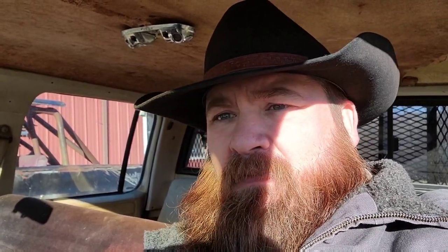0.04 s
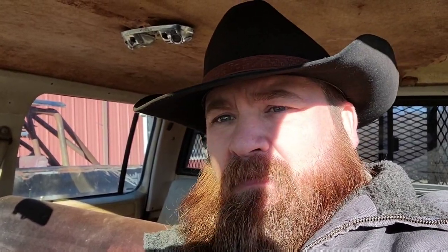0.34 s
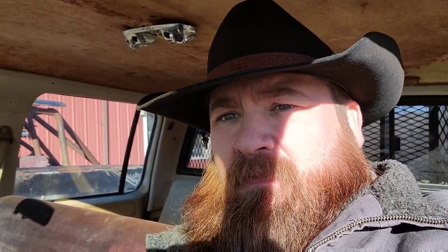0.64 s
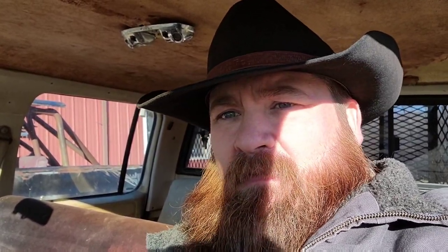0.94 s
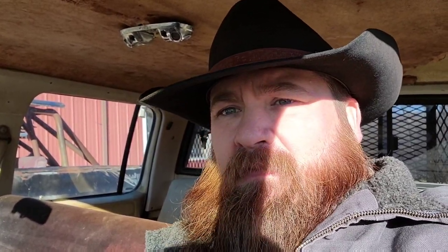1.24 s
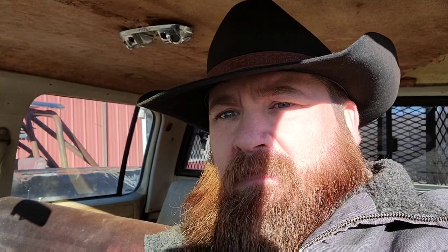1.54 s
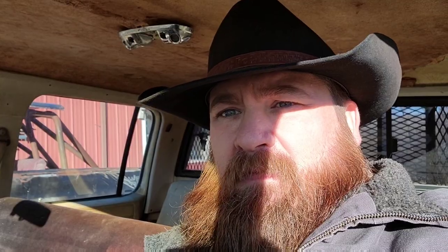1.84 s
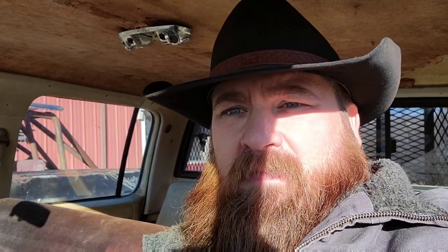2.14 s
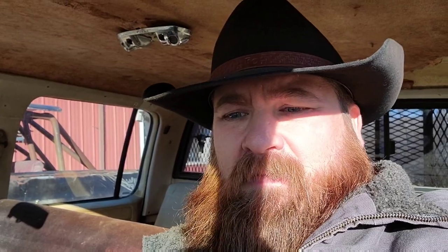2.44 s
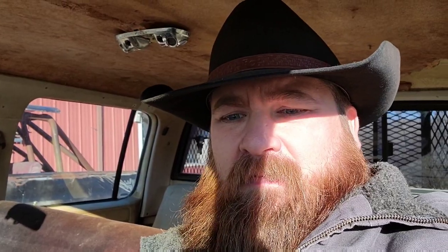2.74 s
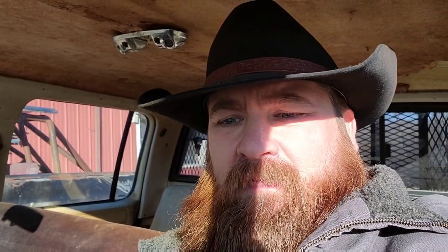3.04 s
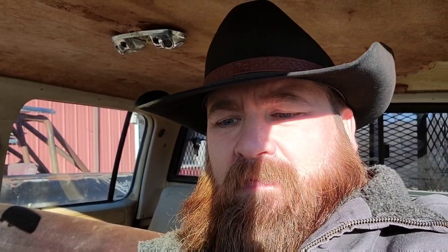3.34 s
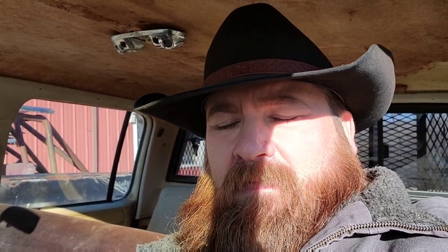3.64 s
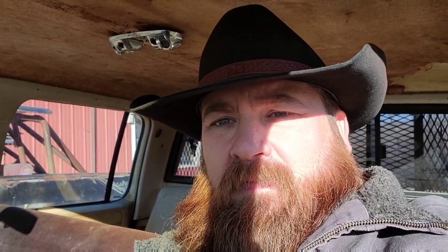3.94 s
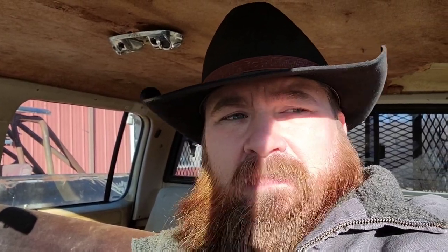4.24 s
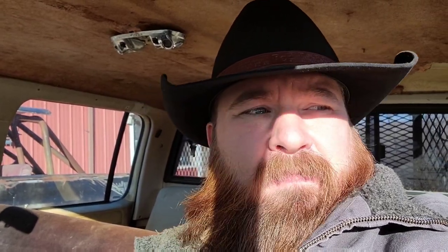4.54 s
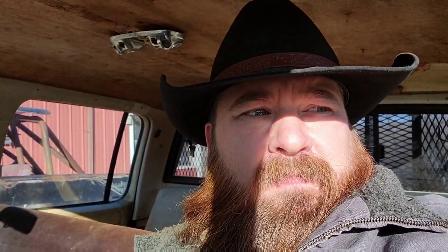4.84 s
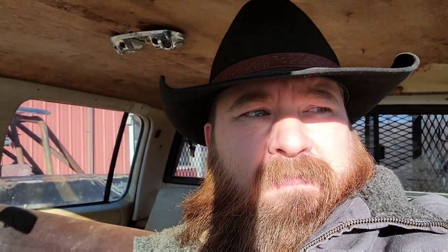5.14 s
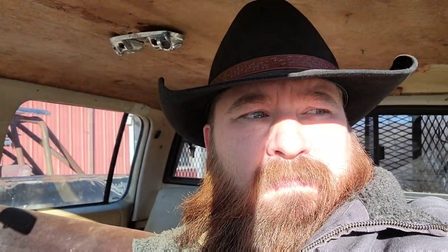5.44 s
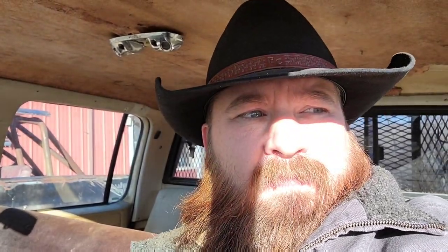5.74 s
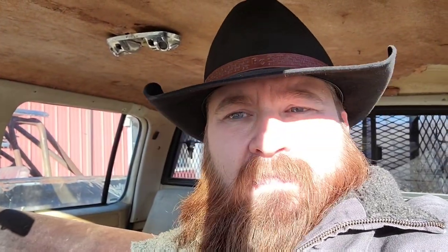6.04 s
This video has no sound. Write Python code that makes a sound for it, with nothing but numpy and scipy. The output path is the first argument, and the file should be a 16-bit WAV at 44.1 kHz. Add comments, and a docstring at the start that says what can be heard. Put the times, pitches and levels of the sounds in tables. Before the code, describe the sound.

Heard from inside a truck cab, a cold V8 engine fires after a quick crank and revs roughly. Its low exhaust thump wavers with misfires while the carburetor gasps and loose tin rattles. The engine slows and nearly dies, coughing and clanking as it shakes. After a short lull the starter engages sharply, cranks, and the engine catches again, still running unevenly.

```python
"""Cold V8 start, from the cab

A big carburetted truck V8 catches, surges and sags on uneven firings, then shudders to a near stop
with loose metal clanking. The starter slams in again and it picks up. Each firing throbs through the
muffler, booms in the cab and barks in the pipes, while air hisses through the carburettor."""
import sys
import numpy as np
from scipy import signal
from scipy.fft import rfft, irfft, next_fast_len
from scipy.io import wavfile
from scipy.ndimage import uniform_filter1d

SR = 44100
rng = np.random.default_rng(int(sys.argv[2]) if len(sys.argv) > 2 else 0)


def store_pcm(level_fs):
    """Save levels as 16-bit WAV."""
    pcm = np.round(np.clip(level_fs, -1, 1) * 32767).astype(np.int16)
    wavfile.write(sys.argv[1], SR, np.atleast_2d(pcm).T)


N = 272538
TIME_S = np.arange(N) / SR


def from_db(db):
    """Decibels to gain."""
    return 10 ** (np.asarray(db) / 20)


def together(*levels_db):
    """Level of several unrelated sounds at once."""
    return 10 * np.log10(sum(from_db(db) ** 2 for db in levels_db))


def unit_rms(x):
    """Scale to unit power."""
    return x / np.sqrt(np.mean(x ** 2) + 1e-20)


def levelled(x, span_s):
    """Even out the slow level and keep the faster beat."""
    size = int(span_s * SR)
    power = uniform_filter1d(uniform_filter1d(unit_rms(x) ** 2, size), size)
    return unit_rms(x) / np.sqrt(np.abs(power) + 1e-5)


def automation(points):
    """Straight ramps between (time_s, value) points."""
    return np.interp(TIME_S, *np.transpose(points))


def hump(time_s, half_s):
    """A smooth rise to 1 and back around a moment."""
    return np.exp(-.5 * ((TIME_S - time_s) / half_s) ** 2)


def since(time_s):
    """Seconds gone by since a moment, 0 before it."""
    return np.maximum(TIME_S - time_s, 0)


def swell(age_s, rise_s):
    """An impact envelope: a soft attack of at least 3 ms, then a decay."""
    age = age_s / max(rise_s, .003)
    burst = np.maximum(age, 0) * np.exp(1 - np.maximum(age, 0))
    scrape = 0.15 * np.exp(-np.abs(age - 1) / 1.87)   # parts rub just before and after they meet
    return burst + scrape


def cut(x, hz, kind, order=2):
    """Butterworth filter."""
    return signal.sosfilt(signal.butter(order, hz, kind, fs=SR, output="sos"), x + 1e-18)


def coloured(x, spectrum):
    """Shape a steady signal with an EQ curve, at unit power."""
    hz, db = np.transpose(spectrum)
    size = next_fast_len(N)
    bins_hz = np.maximum(np.fft.rfftfreq(size, 1 / SR), 1)
    gain = from_db(np.interp(np.log(bins_hz), np.log(hz), db))
    return unit_rms(irfft(rfft(x, size) * gain, size)[..., :N])


def resonate(x, modes):
    """Parallel resonances (pitch_hz, width_hz, gain_db) with alternating signs."""
    out = 0
    for k, (hz, width_hz, db) in enumerate(modes):
        radius = np.exp(-np.pi * width_hz / SR)
        forward = np.array([1, 0, -1]) * (1 - radius ** 2) / 2
        feedback = [1, -2 * radius * np.cos(2 * np.pi * hz / SR), radius ** 2]
        out = out + (-1) ** k * from_db(db) * signal.lfilter(forward, feedback, x + 1e-18)
    return out


def flutter(depth_db, rate_hz):
    """An irregular quiver of level."""
    drift = unit_rms(cut(rng.standard_normal(N), rate_hz, "low"))
    return from_db(depth_db * np.clip(drift, -2, 1.5))


# Stereo image of the cab: frequency_hz, left_right_correlation
CAB_IMAGE = [(100, 1), (250, 0.88), (500, 0.57), (1000, 0.073), (2000, 0.011), (15000, 0.082)]

def diffuse():
    """White noise as the cab spreads it: common in the bass, unrelated in the treble."""
    size = next_fast_len(N)
    alike = np.interp(np.fft.rfftfreq(size, 1 / SR), *np.transpose(CAB_IMAGE))
    mid, side = rfft(rng.standard_normal((2, size)))
    spectrum = np.sqrt(1 + alike) * mid + np.sqrt(1 - alike) * side * [[1], [-1]]
    return unit_rms(irfft(spectrum, size)[:, :N])


def grit(spread_db):
    """Dense tiny impacts of uneven size, each a fraction of a millisecond long."""
    sizes = from_db(spread_db * np.minimum(rng.exponential(1, N // 20 + 1), 4))
    return diffuse() * np.repeat(sizes, 20)[:N]


def cab(x, t60_s, wet_db, low_cut_hz):
    """Close glass and steel return a short dense tail, different on each side."""
    t = TIME_S[:SR // 4]
    tail = cut(rng.standard_normal((2, len(t))), low_cut_hz, "high") * from_db(-60 * t / t60_s)
    tail *= from_db(wet_db) / np.sqrt(np.sum(tail ** 2, axis=1, keepdims=True))
    return (x + signal.fftconvolve(x, tail, axes=1)[:, :N]) / np.sqrt(1 + from_db(wet_db) ** 2)


# Dry metal squeaks: time_s, pitch_hz, level_db, half_length_s, glide_hz_per_s
SQUEAKS = [(0.145, 3310, -44.5, 0.024, -4000), (3.973, 2337, -62.5, 0.051, 0), (4.98, 8214, -55, 0.016, -3),
           (5.08, 4520, -52, 0.014, -1000), (5.081, 3258, -47, 0.017, 0), (5.275, 3240, -48, 0.0098, -7000),
           (5.78, 5900, -48, 0.076, 0)]

def squeaks():
    """Dry metal rubs in short, rough, gliding chirps."""
    roughness = unit_rms(cut(rng.standard_normal((2, N)), 55, "low"))
    chirps = 0
    for time_s, hz, db, half_s, glide in SQUEAKS:
        age = TIME_S - time_s
        chirps += from_db(db) * hump(time_s, half_s) * np.sin(2 * np.pi * (hz + glide * age / 2) * age)
    return roughness * chirps


# Notes of the loose tin in the engine bay: pitch_hz, level_db
TIN_NOTES = [(2300, -6.5), (2700, -1.5), (3000, 2.5), (3260, 2), (3630, 4.5), (3950, 1.5), (4200, 0),
             (5090, -1.5), (5750, -2.5)]

def tin_rattle(touches=1500, t60_s=0.1, rise_s=0.0014):
    """Loose tin buzzes at random; every touch rings roughly, with its own tuning and pan."""
    out, t = np.zeros((2, N + SR // 8)), TIME_S[:SR // 8]
    attack = 1 - np.exp(-t / rise_s)
    for k, (size, detune, side, length) in enumerate(rng.standard_normal((touches, 4))):
        at = int((k + rng.random()) * N / touches)
        hz, db = TIN_NOTES[rng.integers(len(TIN_NOTES))]
        decay = from_db(db + 3.5 * min(size, 1) - 60 * t / (t60_s * np.exp(length / 4)))
        tone = np.sin(2 * np.pi * hz * (1 + 0.05 * detune) * t)
        pan = from_db([[-2 * side], [2 * side]])
        out[:, at:at + len(t)] += pan * attack * decay * tone
    buzz = cut(rng.standard_normal((2, N)), 100, "low")
    return unit_rms(out[:, :N] * buzz)


# Tone of the intake hiss: frequency_hz, gain_db
INTAKE_EQ = [(500, -7.5), (1000, 1.5), (1400, -7), (1900, -6.5), (2500, -2), (3000, -4), (4000, -4),
             (4800, -9), (6000, -10), (7500, -9.5), (9000, -16.5), (10500, -23), (12500, -15.5),
             (15500, -18.5)]
# Bed of air drawn through the carburettor: time_s, hiss_db
DRAUGHT = [(0, -52), (0.2, -50.5), (0.373, -40), (0.8, -42.5), (1.37, -47.5), (1.44, -54), (1.54, -50.5),
           (1.99, -60.5), (2.25, -57.5), (3.1, -65), (3.33, -72), (4.89, -70.5), (4.96, -53.5),
           (5.19, -53.5), (5.5, -45), (6.18, -43)]

def intake(puffs, hiss_db):
    """Air is gulped through the carburettor; a strong draught hisses more sharply."""
    flow = flutter(depth_db=1.8, rate_hz=35) * unit_rms(puffs + 8.1)   # mostly steady, with a rasp
    rush = flow * from_db(hiss_db + 1.1) * coloured(diffuse(), INTAKE_EQ)
    sharpness = np.clip((hiss_db + 57.5) / 17, .35, 1.25)
    top_trim = from_db(-0.1538 * (hiss_db - automation(DRAUGHT)))   # tames the top of sudden rushes
    return cut(rush, 5180, "low", order=4) + sharpness * top_trim * cut(rush, 3850, "high", order=4)


# Hollow knocks and snaps: start_s, pitch_hz, level_db
KNOCKS = [(0.621, 1770, -29), (0.623, 3083, -27), (3.211, 302, -42), (3.633, 1680, -45), (3.703, 400, -37),
          (4.303, 330, -38.5), (4.306, 1805, -45), (4.317, 135, -33.5), (4.551, 946, -49)]

def knocks(rise_s=0.0045, width_hz=160):
    """The shuddering block bumps its stops with a hollow knock."""
    noise, out = diffuse(), 0
    for start_s, hz, db in KNOCKS:
        hollow = cut(resonate(noise, [(hz, width_hz, 0)]), 2 * hz, "low")
        out += from_db(db) * swell(TIME_S - start_s, rise_s) * unit_rms(hollow)
    return out


# Hits of the rocking engine and starter gear: start_s, level_db, thud_db, edge_db, ring_hz, rise_s
CLANKS = [(0.08, -39, -16, -18, 4180, 0.0042), (0.432, -27.5, 2.5, -16, 3640, 0.0044),
          (0.478, -27.5, -4, -11.5, 3600, 0.0039), (0.6237, -20, -7, -15, 3210, 0.0027),
          (3.1298, -46, 5, -16, 2714, 0.0025), (3.171, -35, -5, -43, 2480, 0.0042),
          (3.2077, -35.5, -13, -17, 3500, 0.0025), (3.224, -33, -5, -8, 3440, 0.0033),
          (3.573, -47.5, 1, -10.5, 2650, 0.0049), (3.6328, -37, 0, -22, 2940, 0.0052),
          (3.697, -35, 1, -11.5, 3320, 0.0051), (3.711, -31.5, -29, -15, 4160, 0.0044),
          (3.867, -48.5, 4.5, -7.5, 6300, 0.0081), (4.14, -42, 2, -8, 6170, 0.0055),
          (4.1956, -26, -13.5, -45, 3695, 0.0028), (4.288, -50, 7, -1.5, 5400, 0.0055),
          (4.2993, -39, -3.5, -37, 3050, 0.0092), (4.324, -38.5, -21, -34, 3300, 0.0022),
          (4.543, -43, -13.5, -24, 3770, 0.0061), (4.807, -54.5, 0, -11, 3217, 0.0042),
          (4.895, -34.5, -10, -19, 4310, 0.0043), (4.9128, -22, -37, -16.5, 3830, 0.0071),
          (4.927, -30, -35, -42, 2750, 0.011)]
# Ring of the struck metal: pitch_hz, gain_db
CLANK_MODES = [(2380, -4), (3080, 1.5), (3600, -2), (4060, 4), (4700, -0.5), (5240, -8.5), (7100, -7)]
# Midrange crunch of a clank: frequency_hz, gain_db
CRUNCH_EQ = [(400, -18), (800, -0.5), (1100, -5), (1400, -11.5), (2300, 2.5), (2700, -2), (3200, 2.5),
             (3900, 1), (4800, -6.5), (7000, -13.5), (9000, -31.5), (15000, -71)]
# Its bright edge: frequency_hz, gain_db
EDGE_EQ = [(3000, -9.5), (6000, 7), (8000, -0.5), (10000, -13.5), (13000, -4.5), (15500, -2)]
# Thud of the body under it: frequency_hz, gain_db
THUD_EQ = [(60, -7.5), (130, 8), (200, 0), (350, -4), (520, -16.5), (1000, -22), (2500, -45.5)]

def clanks(width_hz=130, contacts_per_s=1500):
    """A brief run of contacts rings the metal, one tone above the rest, over a longer body thud."""
    crunch, edge, thud = np.zeros((3, N))
    rings = np.zeros((2, N))
    for start_s, db, thud_db, edge_db, ring_hz, rise_s in CLANKS:
        near = np.arange(-SR // 20, SR // 4) + int(start_s * SR)
        age = near / SR - start_s
        burst = from_db(db) * swell(age, rise_s)
        touching = rng.random(len(near)) < contacts_per_s / SR
        contacts = burst * touching * rng.standard_normal((2, len(near)))
        modes = [(hz, width_hz, gain_db + 2.5 * rng.standard_normal()) for hz, gain_db in CLANK_MODES]
        chord = from_db(-6.5) * unit_rms(resonate(contacts, modes))
        note = from_db(-8.5) * unit_rms(resonate(contacts, [(ring_hz, width_hz, 0)]))
        rings[:, near] += np.sqrt(np.mean(burst ** 2)) * (chord + note)
        crunch[near] += from_db(-11) * burst
        edge[near] += from_db(edge_db + 3) * burst
        thud[near] += from_db(db + thud_db + 1.5) * swell(age + 0.0045, 3.4 * rise_s)
    return (rings + crunch * coloured(grit(spread_db=2.5), CRUNCH_EQ)
            + edge * coloured(grit(spread_db=4.5), EDGE_EQ)
            + thud * coloured(diffuse(), THUD_EQ))


def solenoid(start_s=4.887, pitch_hz=380.7, level_db=-37):
    """The solenoid knocks the pinion in for the second start."""
    age = TIME_S - start_s
    return from_db(level_db) * swell(age, rise_s=0.0077) * np.sin(2 * np.pi * pitch_hz * age)


# Bands of the gear whine: pitch_hz, width_hz, weight_db
WHINE_BANDS = [(3100, 97, -6), (3800, 270, -2.5), (4450, 340, 1.5), (5900, 280, -2)]

def starter_whine(grip_db):
    """The pinion whines fitfully on the ring gear, 14.5 dB louder for each doubling of speed."""
    whine_db = grip_db - 58 + 14.5 * np.log2(automation(ENGINE_SPEED) / 23.4)
    whine = 0
    for hz, width_hz, db in WHINE_BANDS:
        chatter = flutter(depth_db=7, rate_hz=8) * rng.standard_normal((2, N))
        whine += from_db(db) * unit_rms(resonate(chatter, [(hz, width_hz, 0)]))
    return from_db(whine_db) * unit_rms(whine)


# Starter cues: engage_s, release_s, first_groan_db
CRANKS = [(0.07, 0.388, -46.5), (4.914, 5.459, -35)]

def cranking(bite_s=0.02, release_db_per_s=196.5, jerk_db_per_s=85):
    """The starter jerks the engine round and keeps it turning: levels of its grip and groan in dB."""
    grips, jerks = [], []
    for engage_s, release_s, groan_db in CRANKS:
        attack_db = 20 * np.log10(np.clip(since(engage_s) / bite_s, 1e-4, 1))
        grip_db = attack_db - release_db_per_s * since(release_s)
        grips.append(grip_db)
        jerks.append(grip_db + groan_db - jerk_db_per_s * since(engage_s))
    grip_db = together(*grips)
    return grip_db, together(grip_db - 52, *jerks)


# The revs: time_s, firings_per_s
ENGINE_SPEED = [(0, 13.2), (.25, 21.5), (.5, 81.2), (1.1, 81.8), (1.28, 56.6), (1.42, 85.4), (1.55, 53.8),
                (1.75, 39.1), (2.0, 34.3), (2.3, 41.5), (2.75, 34.9), (2.95, 39.7), (3.5, 16.2),
                (4.88, 6.18), (5.0, 15), (5.3, 22.9), (5.6, 74), (5.95, 35.2), (6.18, 38.2)]
# Uneven accents of a cross-plane V8, one per cylinder: level_db
CYLINDERS = [-1, -10, -3, -2, -7.5, -1.5, -2.5, -5.5]

def firings(uneven_db, jitter):
    """One impulse and one rounded puff of gas per cylinder; the cold mixture burns unevenly."""
    per_s = automation(ENGINE_SPEED)
    due = np.flatnonzero(np.diff(np.floor(np.cumsum(per_s) / SR), prepend=-1))
    late, burn = rng.standard_normal((len(due), 2)).T
    fired = np.sort(np.clip(due + jitter * late * SR / per_s[due], 0, N - 1).astype(int))
    strength = from_db(np.resize(CYLINDERS, len(due)) + uneven_db * burn)
    pulses = np.zeros(N)
    pulses[fired] = strength
    stroke = np.interp(np.arange(N), fired, np.arange(len(due)))
    puffs = strength[stroke.astype(int)] * np.sin(np.pi * (stroke % 1) ** 0.63) ** 2
    return pulses, levelled(puffs, span_s=0.1)


# The engine runs by itself: catch_s, rise_s, throb_db, stop_s
RUNS = [(0.233, 0.094, -8, 3.053), (5.358, 0.16, -6, 6.3)]
# Cylinders bite or kick back: time_s, throb_lift_db, bark_lift_db, hiss_lift_db, half_length_s
SURGES = [(0.283, 6, 5, 0.5, 0.046), (0.463, 6.5, 11, 3, 0.058), (0.566, 3, 6, 0, 0.049),
          (0.69, 4.5, 3.5, 2.5, 0.028), (1.238, 3, 0.5, 1, 0.016), (1.337, 9.5, 10.5, 6.5, 0.085),
          (2.189, 7, 5.5, 7, 0.036), (2.298, 3, 2.5, 13, 0.045), (2.404, 7.5, 6, 10, 0.018),
          (2.514, 4, 0.5, 12, 0.042), (2.898, 12.5, 8.5, 20.5, 0.05), (3.76, 7.5, 3.5, 1, 0.04),
          (3.952, 1.5, 11, 5, 0.1), (4.192, 5, 10.5, 10.5, 0.068), (4.352, 9.5, 2, -7, 0.095),
          (5.382, 11.5, -17, 5, 0.041), (5.536, 1.5, 6.5, 5, 0.046), (5.69, 1, 7, 4.5, 0.091)]
# Stumbles as cylinders fail to fire: time_s, throb_loss_db (negative lifts), half_length_s
MISFIRES = [(0.328, 16, 0.0095), (0.464, 7, 0.006), (0.587, 11, 0.015), (0.714, 4.5, 0.0114),
            (0.821, 6.5, 0.038), (1.299, 5, 0.0057), (1.36, 2, 0.0034), (1.477, 12.5, 0.0045),
            (1.635, 7.5, 0.0098), (2.056, 8, 0.091), (2.251, 3, 0.0092), (2.43, 4, 0.008),
            (2.65, 6.5, 0.01), (2.851, 12.5, 0.056), (2.988, 8, 0.0066), (3.421, 5.5, 0.098),
            (3.64, 13, 0.04), (3.855, -3, 0.029), (5.463, 10, 0.012), (5.663, 9, 0.006), (5.711, 4, 0.0081),
            (5.782, 10, 0.0035), (5.87, 3.5, 0.012), (6.005, 10, 0.011)]
# Short gasps of the carburettor: time_s, hiss_lift_db
GASPS = [(0.239, 4.5), (1.169, 5.5), (1.51, 8.5), (1.664, 7.5), (1.886, 7.5), (2.588, 13), (2.696, 12.5),
         (3.039, 7.5), (5.228, 7)]

def running(climb_db=32, sag_db_per_s=4, die_db_per_s=38.5, rest_db=-56.5):
    """The engine catches, sags as it starves and dies away: levels of throb, bark and hiss in dB."""
    runs = []
    for catch_s, rise_s, db, stop_s in RUNS:
        attack_db = -climb_db * np.maximum(1 - (TIME_S - catch_s) / rise_s, 0)
        runs.append(db + attack_db - sag_db_per_s * since(catch_s) - die_db_per_s * since(stop_s))
    throb_db = together(rest_db, *runs)
    bark_db = -37.5 + 0.5 * throb_db   # the bark follows half of the throb's swing
    hiss_db = automation(DRAUGHT)
    for time_s, throb_lift, bark_lift, hiss_lift, half_s in SURGES:
        surge = hump(time_s, half_s)
        throb_db += throb_lift * surge
        bark_db += bark_lift * surge
        hiss_db += hiss_lift * surge
    loss_db = sum(db * hump(time_s, half_s) for time_s, db, half_s in MISFIRES)
    gasp_db = sum(db * hump(time_s, half_s=0.02) for time_s, db in GASPS)
    draught_roar_db = hiss_db - 9
    return throb_db - loss_db, together(bark_db - 0.44 * loss_db, draught_roar_db), hiss_db + gasp_db


def waver(channels, depth=0.016, band_hz=(4, 8)):
    """Gusts of hot and cold gas bend the pitch of a ringing pipe up and down."""
    bend = depth * unit_rms(cut(rng.standard_normal(N), band_hz, "band"))
    at = np.arange(N)
    return np.array([np.interp(at + np.cumsum(bend), at, side) for side in channels])


# Pipe accents on hard firings: time_s, pitch_hz, level_db, half_length_s
PIPE_BITES = [(0.448, 1122, -27.5, 0.012), (0.465, 1028, -36.5, 0.016), (0.474, 1518, -46, 0.022),
              (0.538, 344, -32.5, 0.031), (1.334, 1119, -39.5, 0.034), (1.335, 353, -35, 0.036),
              (1.342, 520, -36, 0.026), (5.568, 1112, -31.5, 0.02), (5.57, 1520, -44.5, 0.066),
              (5.571, 758, -36.5, 0.02), (5.575, 527, -37, 0.03)]

def pipe_bites(pulses, width_hz=32.5):
    """At the hardest firings single pipe resonances sing out above the rest."""
    out = 0
    for time_s, hz, db, half_s in PIPE_BITES:
        mode = [(hz, width_hz, 0)]
        note = levelled(resonate(resonate(pulses, mode), mode), span_s=0.03)
        out += from_db(db) * hump(time_s, half_s) * note
    return waver([out])


# Ring of the exhaust pipes: pitch_hz, width_hz, gain_db
PIPE_MODES = [(120, 12, 2.5), (180.3, 13.8, 9.5), (243, 11, -8.5), (339, 10.2, 8), (523.5, 37, -0.5),
              (755.4, 27, -2), (806, 54, -16.5), (1019, 24.4, 1.5), (1103, 19, 0.5), (1498, 28, -12.5),
              (1776, 140, -17.5)]
# Drumming of the body panels: frequency_hz, gain_db
PANEL_EQ = [(60, -18.5), (100, 7.5), (135, 6.5), (200, -1.5), (290, -9), (360, -10.5), (520, -20.5),
            (950, -23), (1400, -39), (2500, -65.5)]

def bark(pulses, puffs, bark_db):
    """Turbulent puffs drum on the panels and ring the pipes in fits; the ring fades as firing stops."""
    flow = unit_rms(puffs + 1)   # puffs on a steady stream
    effort = np.clip((bark_db + 54) / 18, 0, 1)
    drive = flow * diffuse() + effort * unit_rms(pulses)   # hard firings add a crack
    ringing = sum(flutter(depth_db=3.5, rate_hz=8) * resonate(drive, [mode]) for mode in PIPE_MODES)
    panels = flow * coloured(diffuse(), PANEL_EQ)
    pipes = waver(levelled(ringing, span_s=0.0077))
    fade_db = np.clip(bark_db + 52, -10, 0)
    return (from_db(bark_db - 6 + 5.7 * effort + fade_db) * pipes
            + from_db(bark_db + 4.5 - 1.2 * effort) * panels)


# Sub of the block on its mounts: pitch_hz, width_hz, gain_db
MOUNT_MODES = [(39, 11, 0)]

def rocking(pulses, grip_db):
    """Under the starter the block rocks deeply on its mounts."""
    sway = cut(resonate(pulses, MOUNT_MODES), 55, "low", order=3)
    return from_db(grip_db - 41) * levelled(sway, span_s=0.1)


# Thump of the muffler: pitch_hz, width_hz, gain_db
MUFFLER_MODES = [(39.5, 7.9, -12.5), (57.8, 11.2, 1)]
# Boom of the air in the cab: pitch_hz, width_hz, gain_db
CAB_MODES = [(79.67, 9, -18), (123, 30, -28.5)]
# Boom against the muffler, as the firings drift in and out of step with it: time_s, level_db
BOOM_RIDE = [(0.25, -7), (0.46, 9.5), (0.52, 13), (0.62, 2), (0.78, -3.5), (0.9, 6.5), (1.02, 15),
             (1.14, -2), (1.2, 7.5), (1.32, 3.5), (1.43, 9.5), (1.52, -7.5), (1.66, 3), (1.76, 6.5),
             (1.88, 2.5), (2.04, -14), (2.22, 10), (2.4, -1.5), (2.48, 9), (2.82, -8.5), (2.93, 14),
             (3.0, 1.5), (5.5, 2), (5.86, 4), (6.0, 13.5)]
# The tailpipe carries the throb's overtones: pitch_hz, width_hz, gain_db
TAILPIPE_MODES = [(118.4, 31, 0)]

def exhaust(pulses, throb_db, overtones_db=-24.5):
    """Firings thump through the muffler and tailpipe and set the air of the cab booming."""
    muffler = cut(resonate(pulses, MUFFLER_MODES), 67.4, "low", order=5)
    muffler = levelled(cut(muffler, 31, "high"), span_s=0.052)
    boom = cut(resonate(pulses, CAB_MODES), 92.2, "low", order=3)
    boom = levelled(cut(boom, 64.3, "high", order=4), span_s=0.1)
    throb = levelled(muffler + from_db(automation(BOOM_RIDE)) * boom, span_s=0.05)
    throb = cut(throb, 89, "low", order=10)
    overtones = levelled(resonate(resonate(pulses, TAILPIPE_MODES), TAILPIPE_MODES), span_s=0.06)
    gain = from_db(throb_db - 3) * flutter(depth_db=0.8, rate_hz=14)
    return gain * (throb + from_db(overtones_db) * overtones)


def scene():
    """The mix at the seat: low end and pipes dry, air and metal through the cab's short tail."""
    throb_db, bark_db, hiss_db = running()
    grip_db, groan_db = cranking()
    pulses, puffs = firings(uneven_db=4, jitter=0.016)
    low = exhaust(pulses, together(throb_db, grip_db - 39)) + rocking(pulses, grip_db)
    low = np.array([np.interp(TIME_S + 0.00059, TIME_S, low), low])   # the left side leads slightly
    pipes = bark(pulses, puffs, together(bark_db, groan_db)) + pipe_bites(pulses)
    hits = clanks() + knocks()
    air = intake(puffs, hiss_db)
    tin = from_db(hiss_db - 3.5) * tin_rattle()   # shakes along with the intake
    bright = hits + air + tin + solenoid() + starter_whine(grip_db) + squeaks()
    bright = cab(bright, t60_s=0.058, wet_db=2.5, low_cut_hz=910)
    return (low * from_db([[-.7], [.7]]) + pipes * from_db([[-.4], [.4]])
            + bright * from_db([[.6], [-.4]]))


def record(dry):
    """Soft-clip the largest peaks and cut the top steeply."""
    ceiling, cutoff_hz = 0.95, 15450
    rounded = dry / (1 + (dry / ceiling) ** 8) ** (1 / 8)
    return signal.sosfilt(signal.ellip(10, .1, 90, cutoff_hz, fs=SR, output="sos"), rounded)


dry = scene()
out = record(dry)
store_pcm(out)
```